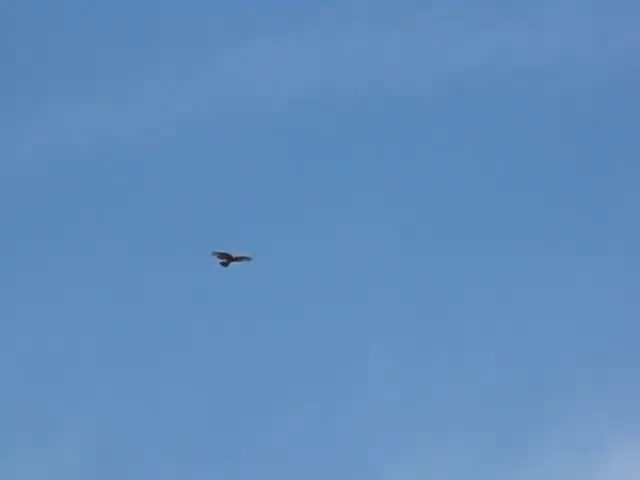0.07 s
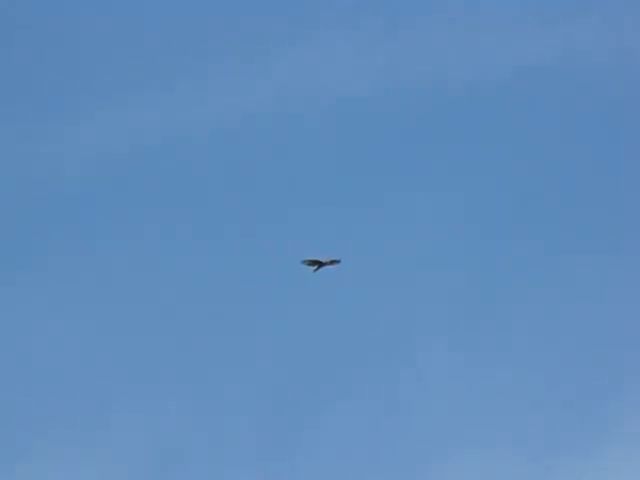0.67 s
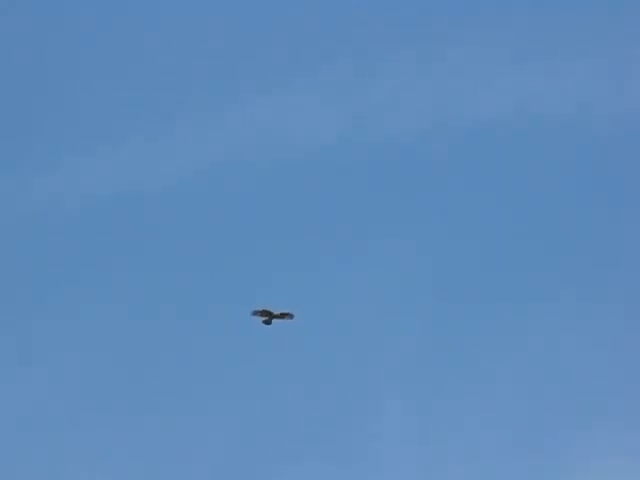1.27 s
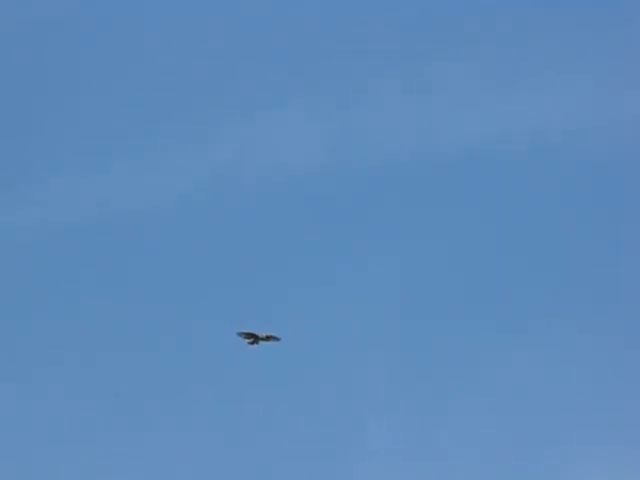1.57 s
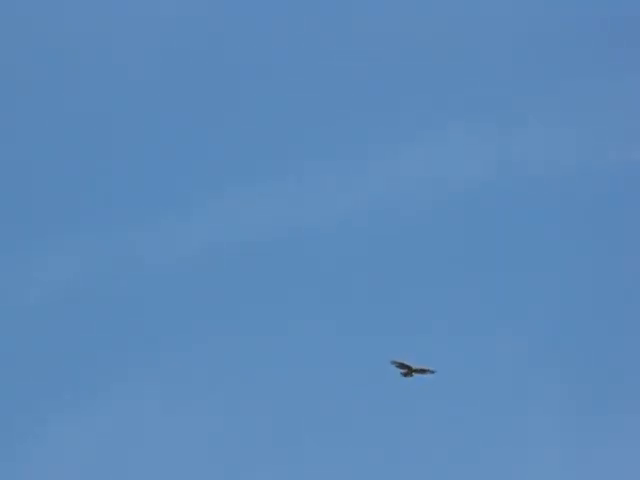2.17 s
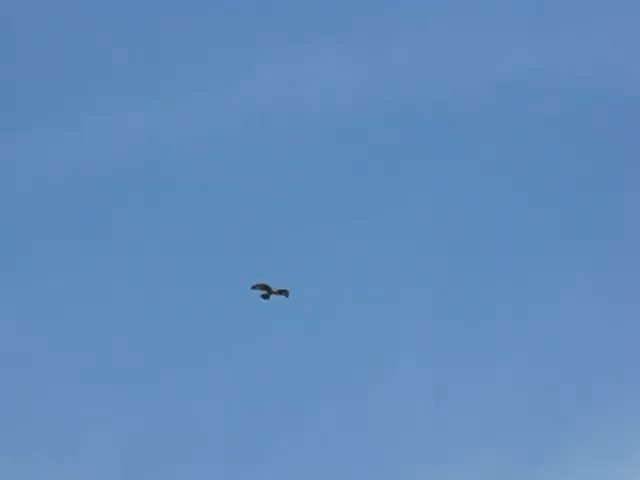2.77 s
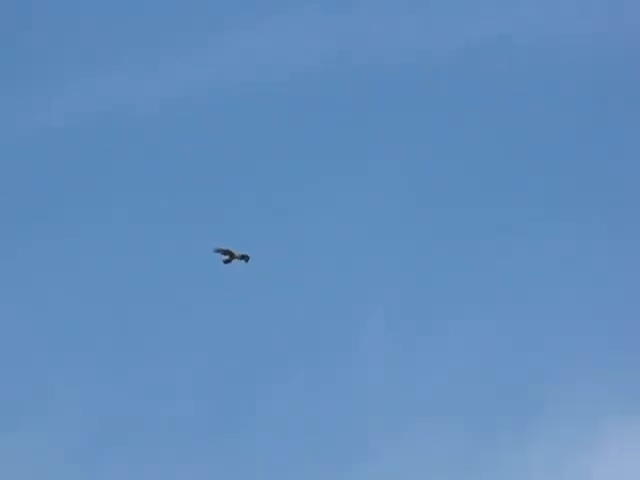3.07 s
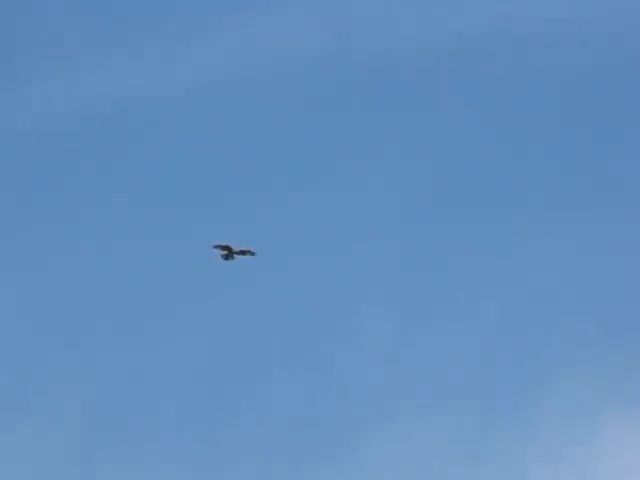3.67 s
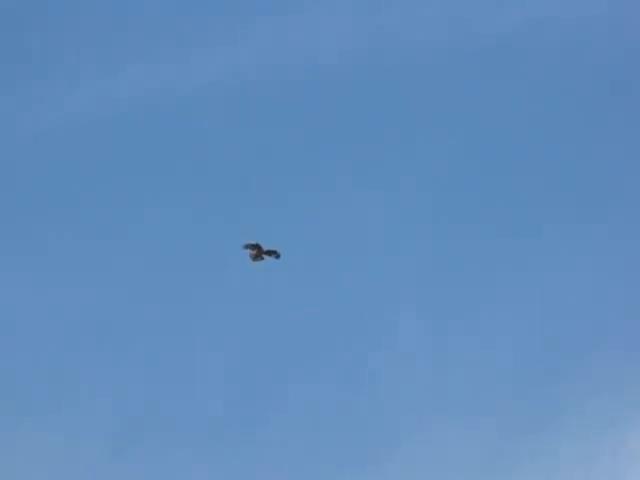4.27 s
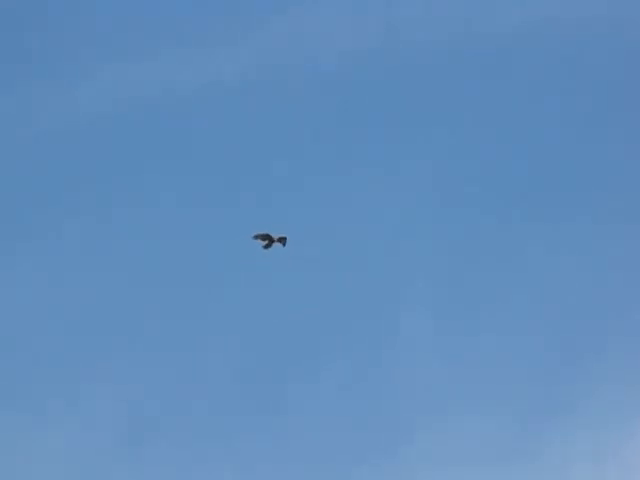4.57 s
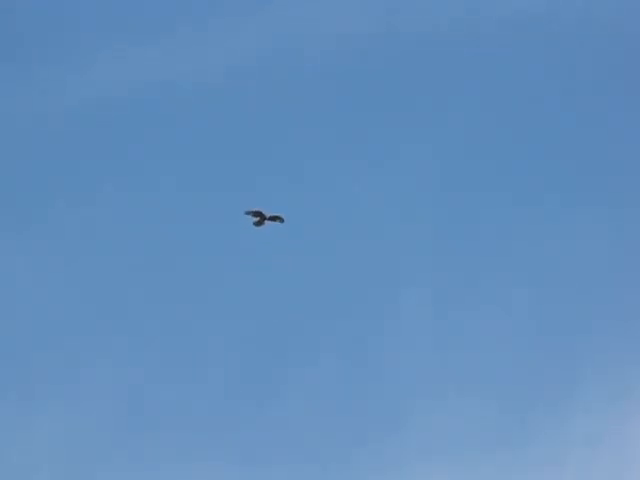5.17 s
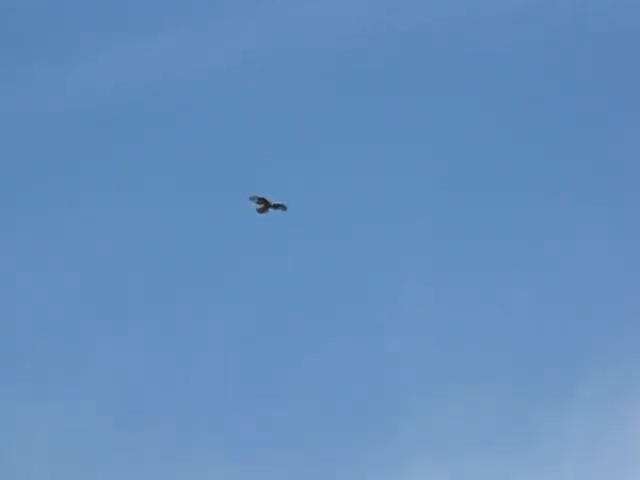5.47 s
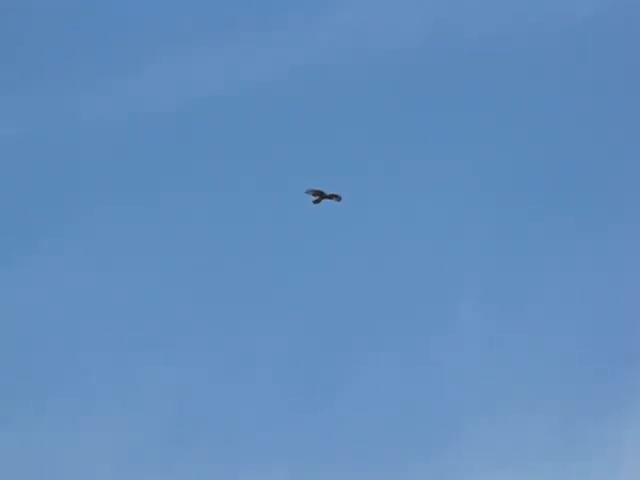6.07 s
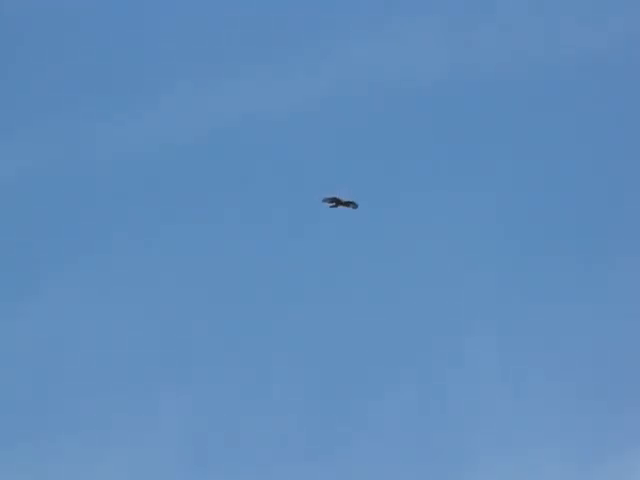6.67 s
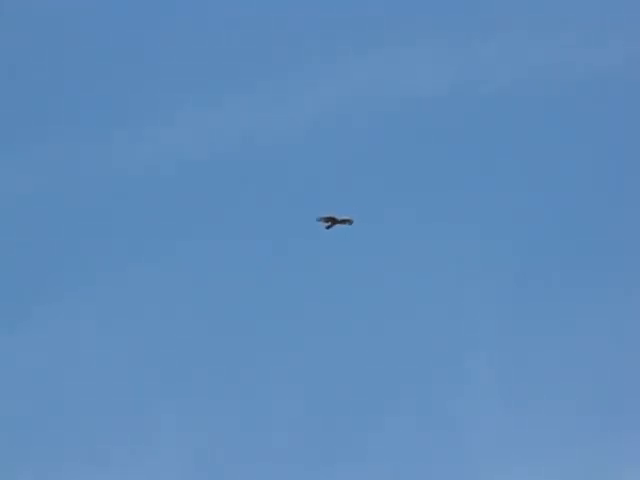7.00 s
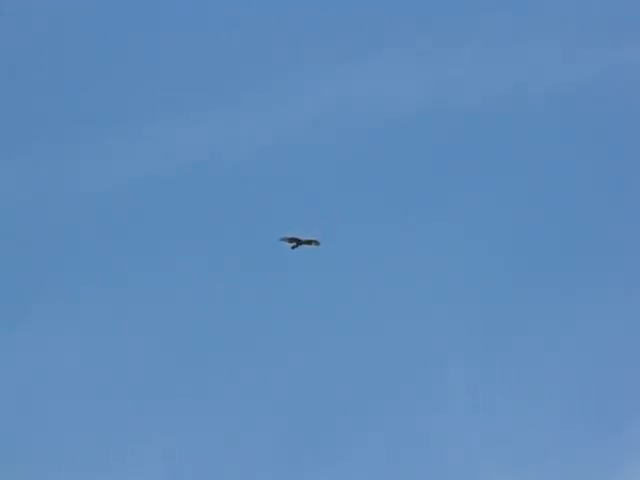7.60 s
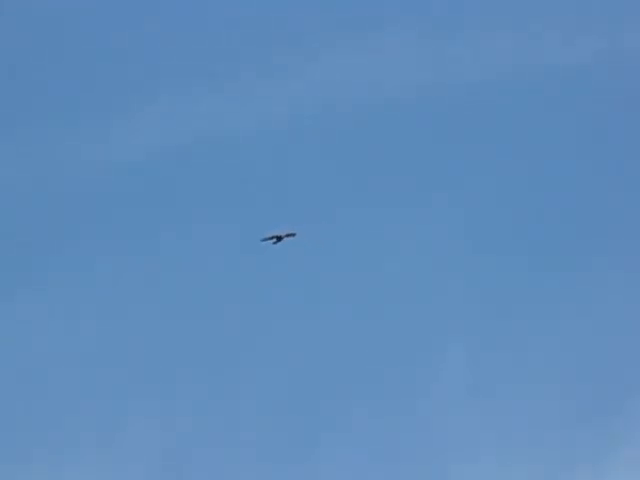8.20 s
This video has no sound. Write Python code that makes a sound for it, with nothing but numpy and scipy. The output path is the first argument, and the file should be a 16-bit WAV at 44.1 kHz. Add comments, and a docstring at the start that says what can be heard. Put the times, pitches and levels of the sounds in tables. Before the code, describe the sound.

Outdoors in open country, low wind and far traffic rumble steadily. A cricket gives thin, high chirps that run together into a quickening trill. A distant engine hum swells and fades, with a faint whine behind it. Past the middle, the hand-held camera gives one sharp, close click, then two light ticks. Leaves hiss faintly in a gust, and two soft, low bumps follow near the end.

```python
"""Bush cricket in open country

A cricket's wing strokes form separate chirps, then speed up into a trill. A hand-held camera gives
one sharp click that ducks its gain, two light ticks and two soft bumps. A gust lifts a hiss from
leaves. Behind: a distant engine that swells and fades, a faint whine, low wind and far traffic."""
import sys
import numpy as np
from scipy import signal
from scipy.fft import irfft, next_fast_len
from scipy.io import wavfile
from scipy.ndimage import uniform_filter1d

SR = 44100
rng = np.random.default_rng(int(sys.argv[2]) if len(sys.argv) > 2 else 0)


def wav_out(sig):
    """Save sig, one row per channel (or a flat mono array), as 16-bit PCM at SR to the path in sys.argv[1]."""
    wavfile.write(sys.argv[1], SR, np.round(np.clip(np.atleast_2d(sig).T, -1, 1) * 32767).astype(np.int16))


N = 367794
T = np.arange(N) / SR

# opening chirps (time [s], strokes [count], level [dB], pitch [Hz])
OPENING_CHIRPS = [(0.221, 2, -44, 6860), (0.448, 4, -46, 6890), (0.57, 3, -47, 6700), (0.9, 3, -49, 6720),
                  (1.075, 3, -53, 6880), (1.249, 4, -54, 6680), (1.473, 4, -50, 6720),
                  (1.629, 5, -49, 6700), (1.76, 4, -49, 6830)]
# course of the trill (time [s], rate [chirps/s], level [dB])
TRILL_CURVE = [(1.9, 9.2, -53), (2.3, 5.4, -52), (2.75, 9.4, -52.5), (3.4, 10.5, -52), (4.6, 12.3, -47.5),
               (5.7, 16.25, -51.5), (5.9, 15.2, -47.5), (6.6, 16.63, -45.5), (6.85, 16.6, -49),
               (7.3, 15.7, -47.5), (8.3, 13, -50.5)]
# snaps on the camera shell (time [s], gain [dB], contact low-pass [Hz], relative rattle [dB])
SHELL_CLICKS = [(4.9613, 0, 19000, -18), (5.339, -17, 1690, -5), (5.3857, -16.5, 3330, -4)]
# shell modes (frequency [Hz], left gain [dB], right gain [dB], t60 [s])
SHELL_MODES = [(476, -28, -30, 0.011), (930, -28, -22, 0.032), (1066, -19.5, -35, 0.019),
               (1390, -10, -23, 0.014), (1563, -11, -11, 0.014), (2296, -26, -15.5, 0.018),
               (2710, -27, -27, .013), (3380, -26.5, -21.5, 0.024), (4020, -15.5, -30, 0.013),
               (5380, -23, -11.5, 0.015), (6290, -18, -17.5, 0.013), (7080, -5.5, 6, 0.0039),
               (8300, -20, -4, 0.0048), (10120, -20, -14, 0.0058), (12660, -21, -2, 0.0023),
               (14300, -22, -13, .003)]
# hand on the camera body (time [s], gain [dB], frequency [Hz], t60 [s])
HAND_BUMPS = [(6.9823, -7.5, 145, 0.034), (7.3877, -14.5, 136, 0.036)]
# one light gust (peak time [s], level [dB], hold [s], rise [dB/s], fall [dB/s])
GUST_SWELL = (6, -58, 1.0, 40, 8)
# leaf hiss (frequency [Hz], relative density [dB])
LEAF_SPECTRUM = [(1500, -20), (3200, -21), (4500, 5), (6000, -1), (8000, -2), (10000, -12), (15500, -24)]
# engine swells (peak time [s], level [dB], hold [s], rise [dB/s], fall [dB/s])
ENGINE_ENVELOPE = [(.5, -41.5, .03, 40, 45), (2.85, -35.5, .2, 13, 7)]
# far machine (frequency [Hz], level [dB])
WHINE_TONES = [(196, -57), (700, -62.5), (941, -63.5), (1175, -67.5), (1574, -63.5)]
# wind and far traffic (frequency [Hz], relative density [dB])
AIR_SPECTRUM = [(15, -11.5), (48, 0.5), (110, -3.5), (230, -12), (370, -14), (500, -18.5), (1050, -18),
                (2050, -26.5), (3400, -25.5), (4700, -34.5), (6000, -36), (7700, -40.5), (9000, -46),
                (15500, -55.5)]
# their slow drift (time [s], rumble gain [dB], hiss gain [dB])
AIR_DRIFT = [(0, 1.4, 0.6), (2.4, 1, 0.27), (5.2, -.5, -0.07), (6.6, 1, -.5), (8.3, 1, -0.14)]
# likeness of the two microphone ports (frequency [Hz], coherence [0..1])
PORT_COHERENCE = [(60, 0.9), (130, 0.96), (290, 0.91), (640, 0.75), (1410, 0.56), (3100, 0.07),
                  (6820, 0.072), (15000, 0.0065)]


def cricket(spacing_s=.0131, width_s=.0014, glide_hz_per_s=60000, spread_hz=59,
            peak_share=0.49, fade_db_per_stroke=1.6, octave_db=-28):
    """Wing strokes, each a short falling tone burst, swell and fade within a chirp."""
    song, t = np.zeros(N), np.arange(-300, 300) / SR
    envelope = np.exp(-.5 * (t / width_s) ** 2)
    for start_s, strokes, db, hz in OPENING_CHIRPS + trill():
        jitter = rng.standard_normal((8, 3))[:round(strokes)]
        strongest = peak_share * (len(jitter) - 1)
        for k, (pitch, force, offset) in enumerate(jitter):
            phase = 2 * np.pi * ((hz + spread_hz * pitch - glide_hz_per_s * t / 2) * t + offset)
            stroke = envelope * (np.sin(phase) + gain_of(octave_db) * np.sin(2 * phase))
            stroke_db = db - fade_db_per_stroke * abs(k - strongest) + .5 * force
            add(song, start_s + k * spacing_s + t[0], gain_of(stroke_db) * stroke)
    return (song + vegetation_scatter(song)) * gain_of([[-4.5], [-2.5]])


def trill(wing_hz=6820, strokes=3.7, spread_strokes=.5, spread_db=1.2, spread_hz=35):
    """An unbroken run of slightly uneven chirps; rows as in OPENING_CHIRPS."""
    t = T[T >= TRILL_CURVE[0][0]]
    rate_hz, _ = curves_at(TRILL_CURVE, t)
    chirp_count = np.floor(np.cumsum(rate_hz) / SR)
    starts_s = t[np.diff(chirp_count, prepend=-1) > 0]
    _, db = curves_at(TRILL_CURVE, starts_s)
    length, force, pitch = rng.standard_normal((len(starts_s), 3)).T
    return list(zip(starts_s, strokes + spread_strokes * length,
                    db + spread_db * force, wing_hz + spread_hz * pitch))


def vegetation_scatter(song, gain_db=-7, decay_s=0.0071):
    """Plants return dense, short echoes, different at each port."""
    lag_s = np.arange(2000) / SR
    paths = rng.standard_normal((2, len(lag_s))) * np.exp(-lag_s / decay_s) * lag_s
    paths *= gain_of(gain_db) / np.linalg.norm(paths, axis=1, keepdims=True)
    return signal.oaconvolve(song[None], paths, axes=1)[:, :N]


def clicks(rise_s=0.00025, rattle_t60_s=0.049, rattle_hz=(650, 1600), crack_db=-16, crack_t60_s=0.0099):
    """A snap cracks and rings the plastic shell; loose parts rattle. Soft contact dulls the sound."""
    out, t = np.zeros((2, N)), np.arange(3000) / SR
    band = signal.butter(2, rattle_hz, "bandpass", fs=SR, output="sos")
    attack = 1 - np.exp(-(t / rise_s) ** 2)
    for start_s, db, contact_hz, rattle_db in SHELL_CLICKS:
        loose = rng.standard_normal(len(t)) + rng.standard_normal((2, len(t)))  # partly shared by ports
        rattle = signal.sosfilt(band, loose) * gain_of(rattle_db - 60 * t / rattle_t60_s)
        crack = rng.standard_normal((2, len(t))) * gain_of(crack_db - 60 * t / crack_t60_s)
        snap = rattle + crack
        for k, (hz, left_db, right_db, t60_s) in enumerate(SHELL_MODES):
            decay = gain_of(np.array([[left_db], [right_db]]) - 60 * t / t60_s)
            snap += (-1) ** k * decay * np.sin(2 * np.pi * hz * t)  # adjacent modes swing opposite ways
        add(out, start_s, gain_of(db) * lowpass(snap * attack, contact_hz, order=4))
    return out


def bumps(rise_s=0.0012, brush_db=-27, brush_hz=450):
    """The hand gives a low, heavily damped push with a little brush of skin."""
    out, t = np.zeros((2, N)), np.arange(4000) / SR
    attack = 1 - np.exp(-t / rise_s)
    for start_s, db, hz, t60_s in HAND_BUMPS:
        brush = unit_rms(lowpass(rng.standard_normal((2, len(t))), brush_hz))
        push = np.sin(2 * np.pi * hz * t) + gain_of(brush_db) * brush
        add(out, start_s, push * gain_of(db - 60 * t / t60_s) * attack)
    return out


def leaves():
    """A gust lifts a fine hiss from the leaves."""
    return swell(*GUST_SWELL) * diffuse_noise(LEAF_SPECTRUM, patch_db=2.7)


def engine(firing_hz=85, sink_hz=4.1, sink_at_s=3.55, sink_s=0.51,
           drift_hz=0.61, waver=0.12, octave_db=-22):
    """A distant firing tone sinks as the engine passes; moving air makes it waver."""
    hz = firing_hz - sink_hz * (1 + np.tanh((T - sink_at_s) / sink_s)) / 2
    phase = 2 * np.pi * np.cumsum(hz + drift_hz * wander(rate_hz=5.8)) / SR
    tone = unit_rms(np.sin(phase) + gain_of(octave_db) * np.sin(2 * phase))
    envelope = sum(swell(*row) for row in ENGINE_ENVELOPE)
    return tone * envelope * (1 + waver * wander(rate_hz=11)) * gain_of([[-.6], [.6]])


def whine(drift_hz=2.453, waver=0.27):
    """Thin tones of a far machine fade in and out on the air."""
    out = np.zeros((2, N))
    for hz, db in WHINE_TONES:
        phase = 2 * np.pi * np.cumsum(hz + drift_hz * wander(rate_hz=6.8)) / SR
        for port in out:
            port += gain_of(db) * unit_rms(np.sin(phase) * (1 + waver * wander(rate_hz=4)))
    return out


def wind_and_traffic(gain_db=-37.5, crossover_hz=250):
    """Diffuse wind and far traffic; rumble and hiss drift separately."""
    air = gain_of(gain_db) * diffuse_noise(AIR_SPECTRUM, patch_db=0.92)
    rumble = lowpass(air, crossover_hz)
    hiss = air - rumble
    rumble_db, hiss_db = curves_at(AIR_DRIFT, T)
    return rumble * gain_of(rumble_db) * gain_of([[-.5], [.5]]) + hiss * gain_of(hiss_db)


def diffuse_noise(spectrum, patch_db, port_lag_s=4.5e-5):
    """Noise of rms 1 with drifting spectral patches; the left port leads the right."""
    hz = np.fft.rfftfreq(2048, 1 / SR)
    left_re, left_im, own_re, own_im, patches = rng.standard_normal((5, N // 512 + 5, len(hz)))
    patches = uniform_filter1d(patches, size=10, axis=0)  # over time
    patches = unit_rms(uniform_filter1d(patches, size=20, axis=1))  # over frequency
    coherence = spectrum_at(PORT_COHERENCE, hz)
    left = left_re + 1j * left_im
    shared = coherence * left * np.exp(-2j * np.pi * hz * port_lag_s)
    right = shared + np.sqrt(1 - coherence ** 2) * (own_re + 1j * own_im)
    frames = np.array([left, right]) * gain_of(spectrum_at(spectrum, hz) + patch_db * patches)
    _, noise = signal.istft(frames.transpose(0, 2, 1), nperseg=2048, noverlap=1536)
    return unit_rms(noise[:, :N])


def swell(peak_s, db, hold_s, rise_db_per_s, fall_db_per_s):
    """Gain that rises, holds and dies away."""
    before_s, after_s = np.maximum(peak_s - T, 0), np.maximum(T - peak_s - hold_s, 0)
    return gain_of(db - rise_db_per_s * before_s - fall_db_per_s * after_s)


def wander(rate_hz):
    """Slow random motion of rms 1, up to about rate_hz."""
    hz = np.fft.rfftfreq(next_fast_len(N), 1 / SR)
    bins = rng.standard_normal((len(hz), 2)) @ [1, 1j]
    return unit_rms(irfft(bins / (1 + (hz / rate_hz) ** 4))[:N])


def gain_of(db):
    """Decibels to amplitude."""
    return 10 ** (np.asarray(db) / 20)


def unit_rms(x):
    """Scales to rms 1."""
    return x / np.sqrt(np.mean(x ** 2) + 1e-20)


def lowpass(x, corner_hz, order=2):
    """Maximally flat low-pass."""
    return signal.sosfilt(signal.butter(order, corner_hz, fs=SR, output="sos"), x)


def spectrum_at(rows, hz):
    """Interpolates a table over log frequency."""
    knots_hz, values = np.transpose(rows)
    return np.interp(np.log(hz + 1), np.log(knots_hz + 1), values)


def curves_at(rows, t):
    """Interpolates each value column over time."""
    knots_s, *columns = np.transpose(rows)
    return [np.interp(t, knots_s, column) for column in columns]


def add(mix, start_s, sound):
    """Mixes a sound in at start_s."""
    part = mix[..., round(start_s * SR):][..., :sound.shape[-1]]
    part += sound[..., :part.shape[-1]]


def scene():
    """All sources at the two microphone ports."""
    return wind_and_traffic() + leaves() + engine() + whine() + clicks() + bumps() + cricket()


def record(dry, threshold_db=-14, slope=0.71, recover_db_per_s=17, smooth_hz=25, edge_hz=15900):
    """Gain control ducks on a loud peak and recovers slowly; then overload and band limit."""
    power_db = 10 * np.log10(abs(uniform_filter1d((dry ** 2).mean(0), size=64)) + 1e-12)
    recovery_db = T * recover_db_per_s
    held_db = np.maximum.accumulate(power_db + recovery_db) - recovery_db
    over_db = np.maximum(held_db - threshold_db, 0)
    duck_db = lowpass(slope * over_db, smooth_hz, order=1)
    ducked = np.clip(dry / gain_of(duck_db), -1, 1)
    band_limit = signal.firwin(511, edge_hz, window=("kaiser", 9), fs=SR)
    return signal.oaconvolve(ducked, band_limit[None], "same")


dry = scene()
out = record(dry)
wav_out(out)
```